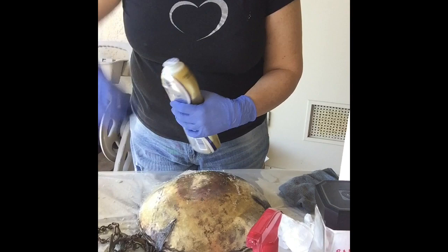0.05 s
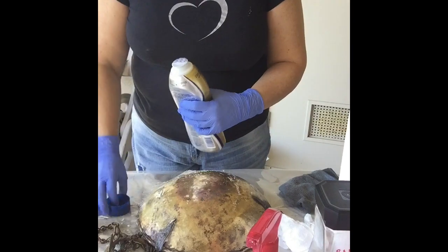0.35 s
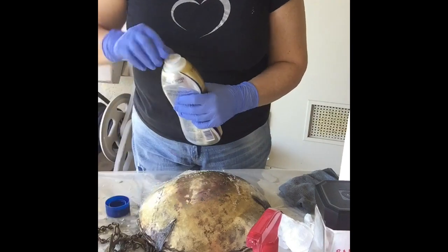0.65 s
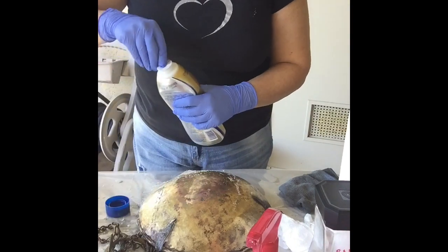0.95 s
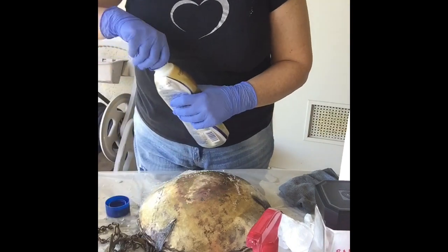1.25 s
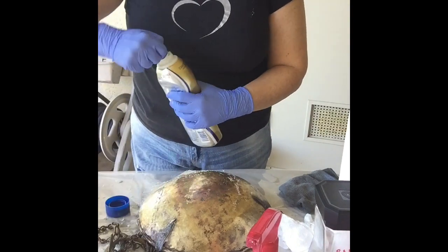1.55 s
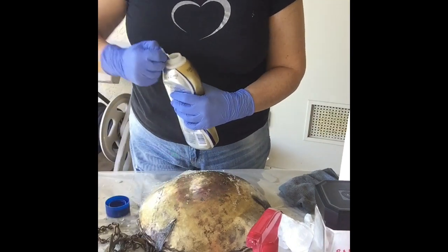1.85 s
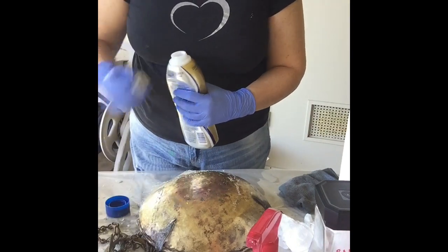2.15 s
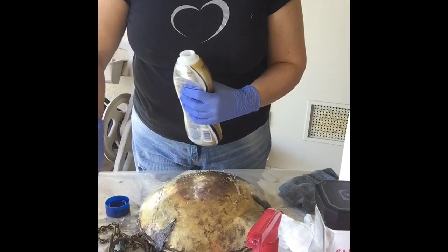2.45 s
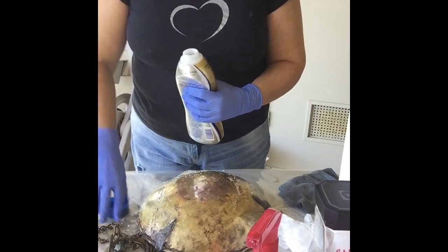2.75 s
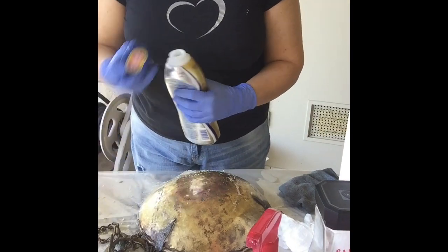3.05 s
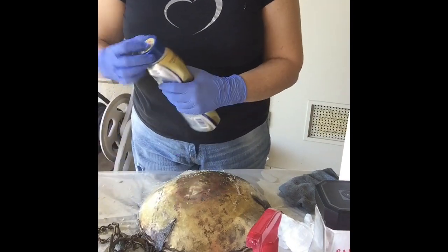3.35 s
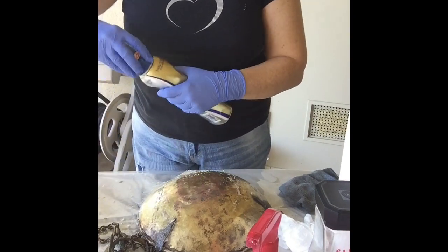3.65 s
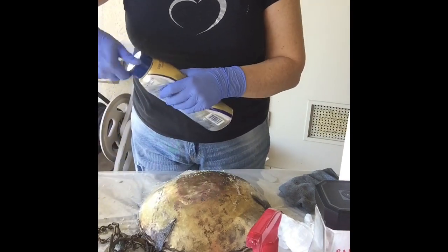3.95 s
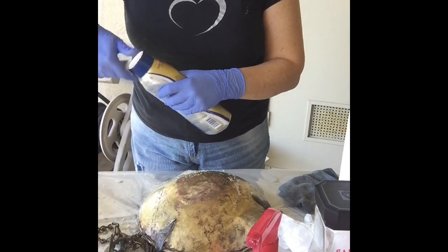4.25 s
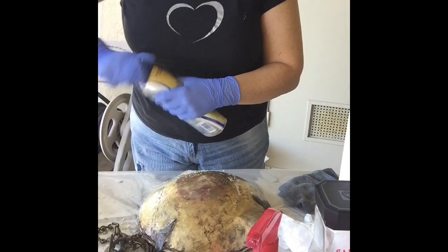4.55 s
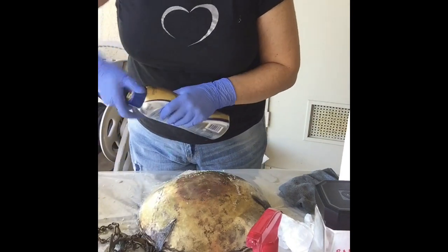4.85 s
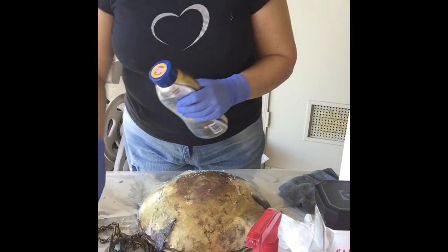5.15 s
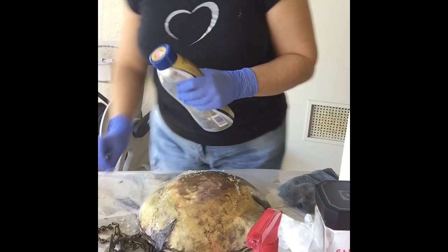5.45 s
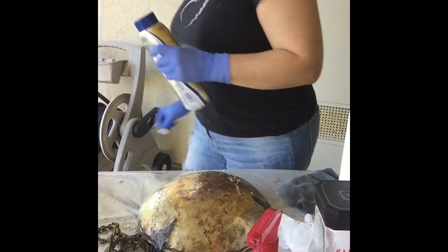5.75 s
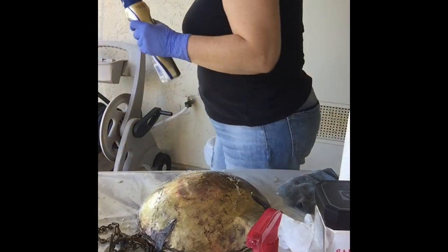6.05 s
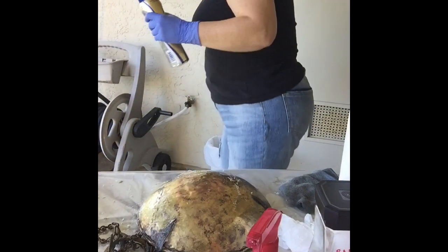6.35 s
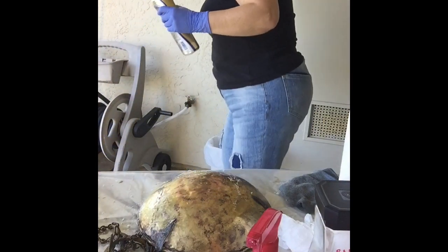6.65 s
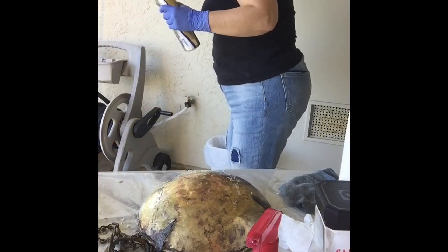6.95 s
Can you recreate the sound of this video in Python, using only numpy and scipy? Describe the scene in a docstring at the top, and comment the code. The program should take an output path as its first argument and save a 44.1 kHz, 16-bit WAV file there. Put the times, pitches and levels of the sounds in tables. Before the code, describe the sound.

Over a throbbing hum, a cap knocks on a tabletop, gloved hands pick at a plastic bottle and twist a lid on.

```python
"""A plastic cleanser bottle in gloved hands: it clicks and thuds as the seal is picked off, and a lid
grates on its thread in tiny slips as it is screwed on. First a cap lands on a table and sets the top
ringing; near the end clothes swish as the person turns away. Behind the wall of the small, hissing
room a machine throbs and its two motors beat against each other. A thin whistle fades at the start."""
import sys
import numpy as np
from scipy import signal
from scipy.fft import rfft, irfft, next_fast_len
from scipy.io import wavfile
from scipy.ndimage import map_coordinates

SR = 44100
rng = np.random.default_rng(int(sys.argv[2]) if len(sys.argv) > 2 else 0)


def dump_mix(stems):
    """Bounce the given channels to the path in sys.argv[1] as a 16-bit WAV at rate SR."""
    frames = np.atleast_2d(stems).T  # one column per channel
    limited = np.clip(frames, -1, 1)  # hard clip at full scale
    pcm = np.round(limited * 32767).astype(np.int16)
    wavfile.write(sys.argv[1], SR, pcm)


N = 308259

# room noise spectrum: freq_hz, gain_db
AIR_SPECTRUM = [(15, -54), (26, -23), (40, -23), (55, -8), (75, 8), (100, -5.5), (150, 0.5), (210, -9),
                (320, -11), (520, -19), (900, -17), (1900, -23), (5500, -29), (10500, -36.5), (16000, -41)]
# room decay: freq_hz, t60_s
ROOM_DECAY = [(200, 0.33), (800, 0.23), (2500, 0.23), (6000, 0.23), (14000, 0.16)]
# whistle envelope: time_s, level_db
WHISTLE_LEVEL = [(0, -62), (.2, -62), (.36, -69), (.45, -110)]
# main motor envelope: time_s, level_db
MAIN_MOTOR_LEVEL = [(0, -55.5), (1.7, -54), (2.4, -49), (3.9, -46), (4.15, -56), (4.9, -56), (5.2, -72),
                    (7, -74)]
# main motor speed: time_s, pitch_hz
MAIN_MOTOR_PITCH = [(0, 71.73), (1, 71.23), (2, 70.84), (3.6, 70.5), (4.1, 69.67), (4.8, 66.5), (5.3, 68.9),
                    (7, 67.1)]
# second motor envelope: time_s, level_db
SECOND_MOTOR_LEVEL = [(0, -52.5), (1.3, -54), (2.5, -56.5), (4.8, -67), (5.4, -61), (6, -59.5), (7, -77)]
# weak tones beside the motors: pitch_hz, level_db
SIDE_TONES = [(80.4, -64), (95.2, -62), (44.5, -67)]
# brief higher tone in the hum: time_s, level_db
BRIEF_TONE_LEVEL = [(.4, -100), (.65, -70.5), (1.05, -70), (1.45, -73), (1.8, -100)]
# runs of machine throbs: start_s, end_s, period_s
THROB_SPANS = [(.722, 3.3, .2075), (4.272, 6.2, .187)]
# throb strength: time_s, level_db
THROB_LEVEL = [(.7, -61.5), (1.2, -60.5), (1.95, -52.5), (3, -51.5), (3.25, -61.5), (4.25, -45.5), (5, -54),
               (5.3, -57), (6.2, -61.5)]
# cloth friction spectrum: freq_hz, gain_db
CLOTH_SPECTRUM = [(100, -9), (400, 3), (1200, 9.5), (3000, 8.5), (7000, 3), (10000, -13), (16000, -18)]
# clothes brushing: start_s, end_s, relative_db, swell_db, low_db, high_db
CLOTH_STROKES = [(5.295, 5.4, -55.5, -3.5, 2.5, 1), (5.4, 5.485, -44, 5.5, 5.5, -6),
                 (5.622, 5.676, -50.5, 7, 4.5, -10.5), (6.255, 6.3, -64.5, -1, 6, -27),
                 (6.518, 6.54, -58, 4, 7, -2)]
# cap landing and rocking: time_s, relative_db
CAP_HITS = [(.3700, -19), (.3845, -38), (.3990, -33), (.4120, -37.5), (0.44, -43), (0.463, -47)]
# cap impact spectrum: freq_hz, gain_db
CRACK_SPECTRUM = [(100, -23), (300, 3.5), (750, -2.5), (1100, 3.5), (1450, 3), (2400, -7.5), (3600, -7),
                  (4500, -14), (7000, -25.5), (10000, -34), (16000, -37)]
# table top modes: freq_hz, relative_db, t60_s
TABLE_MODES = [(179.5, -12, 0.19), (250, -16, 0.36), (295.2, -12, 0.37), (341, -1.5, 0.13),
               (404, -10, 0.16), (457, -18, 0.14), (626, -13, 0.11), (807, 1.5, 0.13), (900, -5, 0.14),
               (1006, -14.5, 0.17), (1193, -6.5, 0.12), (1370, -13, 0.1), (1520, -16, 0.12),
               (1665, -7, 0.074), (2020, -6, 0.083), (2530, -21.5, 0.072), (3200, -17, 0.092),
               (3570, -19, .13)]
# rubber friction spectrum: freq_hz, gain_db
RUBBER_SPECTRUM = [(100, 0), (350, -1), (700, -9.5), (1500, 5), (4000, 2), (6500, 5), (10000, -7),
                   (16000, -11.5)]
# gloves rubbing plastic: start_s, end_s, relative_db, swell_db, low_db, high_db
GLOVE_STROKES = [(0.895, 0.915, -56.5, 3, 12, 8), (1.523, 1.566, -44.5, 0.5, 15.5, -14),
                 (1.66, 1.69, -62, 4, 4, 2), (2.525, 2.555, -58.5, 0.5, -13, 4),
                 (2.825, 2.885, -56.5, 2, 10.5, -4.5), (2.93, 3.03, -73, -1.5, 14, 3),
                 (3.15, 3.25, -72, 0, -6, 2), (3.41, 3.445, -58.5, -1, 10.5, -8),
                 (3.515, 3.545, -61.5, 1.5, 2, 5), (6.722, 6.8, -45.5, 15, 0, 12)]
# bottle and lid resonances: freq_hz, width_hz, gain_db
PLASTIC_MODES = [(1062, 285, -1), (1410, 310, -2), (2200, 920, -2), (3510, 890, -3), (4360, 1500, -5.5),
                 (5360, 370, -6), (5790, 470, 0.5), (6460, 1470, -4), (7650, 390, -3.5), (8560, 1160, -8),
                 (9670, 700, -7.5), (11330, 610, -13), (12100, 2100, -13.5), (14300, 2600, -15)]
# rim ringing as the lid is seated and tightened: time_s, gain_db
RIM_GAIN = [(3.9, -13), (4.22, -4), (4.35, 11), (4.55, -4), (4.62, -6)]
# lid twists on the thread: start_s, end_s, relative_db, swell_db, low_db, high_db
LID_TWISTS = [(3.76, 3.855, -63.5, 1.5, 0, -16), (3.861, 4.003, -43.5, 5.5, -6, -8.5),
              (4.221, 4.296, -43, 1, -1.5, -8.5), (4.31, 4.4, -55, -3.5, 11, -17),
              (4.415, 4.477, -48, 4.5, -1, -12.5), (4.526, 4.69, -45.5, -0.5, -1.5, -16)]
# hollow bottle thuds: time_s, relative_db, pitch_hz
WALL_THUDS = [(1.524, -43, 388), (1.535, -48, 227), (2.018, -46.5, 694), (2.857, -50.5, 430),
              (3.33, -59, 502), (3.446, -43, 391), (4.247, -44.5, 245), (4.275, -46, 380),
              (4.405, -52, 413), (4.526, -52, 248)]
# fingertip ticking: start_s, end_s, ticks_per_s, relative_db
TICK_SPANS = [(1.044, 1.246, 15, -63.5)]
# plastic contacts: time_s, relative_db, low_db, high_db, contact_t60_s, ring_hz
PLASTIC_CLICKS = [(0.412, -45, -17, -3, 0.0077, 5030), (0.4837, -51.5, -5, -3, 0.053, 5600),
                  (0.878, -60.5, 6, -25, 0.034, 2080), (1.262, -37, -14, 6, 0.0039, 4340),
                  (1.2845, -39, 0.5, 6, 0.0087, 4200), (1.5671, -37, 5, -10.5, 0.018, 2970),
                  (1.663, -49, 11, -25, 0.027, 1390), (1.675, -44.5, 11.5, -21, 0.028, 2410),
                  (1.685, -35, -4, -9, 0.0081, 3400), (2.0181, -28.5, 0, 1.5, 0.015, 3750),
                  (2.5333, -56, -12, -3, 0.014, 4330), (2.6269, -45.5, -27, -6, 0.0032, 3630),
                  (2.829, -54.5, 11, 3, 0.0049, 6160), (2.857, -53, 0, -3, 0.021, 1510),
                  (3.323, -44, 5, -10.5, 0.055, 3370), (3.329, -37, 8.5, -17, 0.02, 910),
                  (3.4462, -38.5, 19.5, -17, 0.02, 2120), (3.601, -55.5, -8, -3.5, 0.09, 4300),
                  (3.6242, -48, 7.5, -11, 0.03, 3970), (4.2759, -43.5, 15, 1, 0.014, 6000),
                  (4.2935, -30, 9.5, -18.5, 0.02, 2210), (4.4047, -41, 23.5, -38, 0.015, 3340),
                  (4.4338, -45.5, 8, -29, 0.04, 3380), (4.5, -56, 9, -17, 0.012, 3420),
                  (4.525, -50.5, 21, -14, 0.01, 3420), (4.944, -60.5, 5, -2, 0.013, 3950),
                  (5.3246, -36.5, -9, -4.5, 0.00088, 6400), (5.8283, -48, -10, -1.5, 0.0043, 2160),
                  (6.872, -44, -9, 5.5, 0.14, 3700)]


def amp(db):
    """Decibels to gain."""
    return 10 ** (np.asarray(db) / 20)


def unit(x):
    """Scale to rms 1."""
    return x / np.sqrt(np.mean(x ** 2) + 1e-20)


def along(points, hz):
    """(freq_hz, value) rows read on a log axis."""
    freqs_hz, values = np.transpose(points)
    return np.interp(np.log(hz + 1), np.log(freqs_hz + 1), values)


def curve(rows):
    """(time_s, value) rows as one value per sample."""
    return np.interp(np.arange(N) / SR, *np.transpose(rows))


def wobble(knots_per_s, size):
    """Smooth random curve."""
    knots = rng.standard_normal(int(size * knots_per_s / SR) + 4)
    return map_coordinates(knots, [np.arange(size) * knots_per_s / SR])


def add(track, start_s, sound):
    """Mix a sound into the track."""
    part = track[max(round(start_s * SR), 0):][:len(sound)]
    part += sound[:len(part)]


def coloured(x, gain, size=8192):
    """Minimum-phase filter of magnitude gain(hz); output at rms 1."""
    cepstrum = irfft(np.log(np.maximum(gain(np.fft.rfftfreq(size, 1 / SR)), 1e-6)))
    cepstrum[1:size // 2] *= 2
    cepstrum[size // 2 + 1:] = 0
    return unit(signal.fftconvolve(x, irfft(np.exp(rfft(cepstrum))))[:len(x)])


def peak(hz, centre_hz, half_width_hz):
    """Resonance curve of height 1."""
    return 1 / (1 + ((hz - centre_hz) / half_width_hz) ** 2)


def air():
    """Steady room hiss; its low rumble eases as the machine quietens."""
    gain = amp(-59.5 + 0.36 * wobble(2.34, N))
    noise = gain * coloured(rng.standard_normal(N), lambda hz: amp(along(AIR_SPECTRUM, hz)))
    rumble = signal.sosfiltfilt(signal.butter(2, 450, fs=SR, output="sos"), noise)
    return noise - rumble + rumble * amp(curve([(0, 3.5), (4.5, 0), (6.9, -2.5)]))


def room(x, build_s=0.0021):
    """Close walls return a short, diffuse tail."""
    hz, t, spectrum = signal.stft(rng.standard_normal(SR // 2), SR, nperseg=256)
    tail = signal.istft(spectrum * amp(-60 * t / along(ROOM_DECAY, hz)[:, None]), SR, nperseg=256)[1]
    tail *= 1 - np.exp(-np.arange(len(tail)) / SR / build_s)
    return signal.fftconvolve(x, tail / np.linalg.norm(tail))[:N]


def whistle(pitch_hz=2170, width_hz=190, hiss_db=-17):
    """Narrow noise band with a little hiss."""
    colour = lambda hz: peak(hz, pitch_hz, width_hz / 2) + amp(hiss_db) * peak(hz, 3600, 1500)
    return amp(curve(WHISTLE_LEVEL)) * coloured(rng.standard_normal(N), colour)


def motors(second_hz=67.68, antiphase_s=.02, brief_tone_hz=388):
    """Two motors at nearly equal speed beat; weaker tones waver beside them."""
    t = np.arange(N) / SR
    turns = np.cumsum(curve(MAIN_MOTOR_PITCH)) / SR
    turns -= np.interp(antiphase_s, t, turns)
    main = amp(curve(MAIN_MOTOR_LEVEL)) * np.sin(2 * np.pi * turns)
    second = amp(curve(SECOND_MOTOR_LEVEL)) * np.sin(2 * np.pi * second_hz * (t - antiphase_s))
    out = np.sqrt(2) * (main - second)
    for hz, db in SIDE_TONES + [(brief_tone_hz, curve(BRIEF_TONE_LEVEL))]:
        swell_db, drift_rad = 3.5 * wobble(9, N), .8 * wobble(7, N)
        out += amp(db + swell_db) * np.sin(2 * np.pi * hz * t + drift_rad)
    return out


def throbs(pitch_hz=174, scatter_hz=7.1, scatter_db=2.0, rise_s=.024, fall_s=.042):
    """Soft machine pulses of tone and rumble, about five a second."""
    out = np.zeros(N)
    t = np.arange(SR // 3) / SR - .12
    swell = np.exp(-(t / np.where(t < 0, rise_s, fall_s)) ** 2)
    for time_s in np.concatenate([np.arange(*span) for span in THROB_SPANS]):
        db = np.interp(time_s, *np.transpose(THROB_LEVEL)) + rng.normal(0, scatter_db)
        tone = np.sin(2 * np.pi * (rng.normal(pitch_hz, scatter_hz) * t + rng.random()))
        rumble = coloured(rng.standard_normal(len(t)), lambda hz: peak(hz, 185, 60) ** 2)
        add(out, time_s + t[0], amp(db) * swell * (tone + 0.47 * rumble))
    return out


def touch(hz, low_db, high_db):
    """Contact gain: soft, broad contacts favour lows, sharp edges highs."""
    return amp(along([(1050, low_db), (2100, 0.0044), (4000, 0.0042), (7000, high_db)], hz))


def friction(rows, body, slips_per_s, hiss_db, edge_s, uneven_db, swell_at, swell_width):
    """Tiny random slips over hiss, shaped by body(hz, start_s); pressure swells once per stroke."""
    out, margin_s = np.zeros(N), .03
    for start_s, end_s, db, swell_db, low_db, high_db in rows:
        length_s = max(end_s - start_s, .005)
        t = np.arange(int((length_s + 2 * margin_s) * SR)) / SR - margin_s
        rise = .5 + .5 * np.tanh(t / edge_s)
        fall = .5 + .5 * np.tanh((length_s - t) / edge_s)
        bump = np.exp(-((t / length_s - swell_at) / swell_width) ** 2)
        pressure = amp(swell_db * (bump - 1))  # dips instead if swell_db < 0
        slips = (rng.random(len(t)) < slips_per_s / SR) * rng.standard_normal(len(t))
        force = unit(slips) + amp(hiss_db) * rng.standard_normal(len(t))
        force *= amp(uneven_db * wobble(139, len(t)))
        rub = coloured(force, lambda hz: body(hz, start_s) * touch(hz, low_db, high_db))
        add(out, start_s - margin_s, amp(db) * pressure * np.sqrt(rise * fall) * rub)
    return out


def clothes():
    """Fabric brushes in dense, uneven slips."""
    fabric = lambda hz, _: amp(along(CLOTH_SPECTRUM, hz))
    return amp(-2) * friction(CLOTH_STROKES, fabric, slips_per_s=4000, hiss_db=-3, edge_s=.01,
                              uneven_db=3, swell_at=.5, swell_width=.35)


def cap_landing(ring_db=-8.5, attack_s=0.0008, crack_db=2.5, crack_t60_s=0.031):
    """The cap cracks onto the table, rocks and rings the top."""
    out, t = np.zeros(N), np.arange(SR // 2) / SR
    for time_s, db in CAP_HITS:
        modes = sum((-1) ** k * amp(mode_db + rng.normal(0, 1.2) - 60 * t / t60_s)
                    * np.sin(2 * np.pi * hz * t) for k, (hz, mode_db, t60_s) in enumerate(TABLE_MODES))
        ring = amp(ring_db) * modes * (1 - np.exp(-t / attack_s))
        noise = coloured(rng.standard_normal(len(t)), lambda hz: amp(along(CRACK_SPECTRUM, hz)))
        crack = noise * amp(crack_db - 60 * t / crack_t60_s)
        add(out, time_s, amp(db) * (ring + crack))
    return out


def gloves():
    """Rubber rubs on plastic in short, hissy strokes."""
    rubber = lambda hz, _: amp(along(RUBBER_SPECTRUM, hz)) * (1 + (hz / 16000) ** 2)
    return amp(-0.5) * friction(GLOVE_STROKES, rubber, slips_per_s=940, hiss_db=1, edge_s=.003,
                                uneven_db=.5, swell_at=.52, swell_width=.16)


def bottle_gain(hz, detune=1, damping=1, valley_db=-17):
    """Plastic resonances, shifted and damped by the grip, over the broad sound of the walls."""
    mode_power = sum((amp(db) * peak(hz, mode_hz * detune, width_hz * damping / 2)) ** 2
                     for mode_hz, width_hz, db in PLASTIC_MODES)
    valley_power = amp(valley_db) ** 2 / (1 + (hz / 5000) ** 4)
    return np.sqrt(mode_power + valley_power) * hz / (hz + 120)


def lid_gain(hz, time_s, rim_hz=3430, skirt_hz=5950, skirt_db=-7, fizz_db=3):
    """Bottle resonances plus the lid's rim and skirt modes; the dry thread adds fizz."""
    rim = amp(np.interp(time_s, *np.transpose(RIM_GAIN))) * peak(hz, rim_hz, 260) ** 2
    skirt = amp(skirt_db) * peak(hz, skirt_hz, 260) ** 2
    fizz = amp(along([(7000, 0), (12000, fizz_db)], hz))
    return (bottle_gain(hz, damping=0.96, valley_db=-14) + rim + skirt) * fizz


def lid_thread():
    """The lid grates on its thread with each twist."""
    return amp(-1.24) * friction(LID_TWISTS, lid_gain, slips_per_s=1300, hiss_db=-3, edge_s=.006,
                                 uneven_db=2, swell_at=.65, swell_width=.2)


def bottle_thuds(gain_db=2, attack_s=0.0034, t60_s=0.12):
    """A pressed wall flexes and rings in three low modes."""
    out, t = np.zeros(N), np.arange(SR // 3) / SR
    envelope = amp(-60 * t / t60_s) * (1 - np.exp(-t / attack_s))
    for time_s, db, hz in WALL_THUDS:
        modes = [(1, 1), (rng.uniform(0.815, .92), .4), (rng.uniform(1.1, 2.1), .4)]
        ring = sum(gain * np.sin(2 * np.pi * hz * ratio * t) for ratio, gain in modes)
        add(out, time_s, amp(db + gain_db) * ring * envelope)
    return out


def fingertip_ticks(scatter_db=8, low_db=3.5, high_db=2.6, t60_s=0.022, ring_hz=5900):
    """Faint, irregular fingertip contacts, as PLASTIC_CLICKS rows."""
    rows = []
    for start_s, end_s, ticks_per_s, db in TICK_SPANS:
        count = max(round((end_s - start_s) * ticks_per_s), 1)
        for k, (jitter, strength) in enumerate(rng.random((count, 2))):
            time_s = start_s + (end_s - start_s) * (k + jitter) / count
            rows.append((time_s, db + scatter_db * (2 * strength - 1), low_db, high_db, t60_s, ring_hz))
    return rows


def bottle_clicks(gain_db=-1.5, strain_db=-20, strain_t60_s=0.015, linger_db=-13, linger_t60_s=0.074):
    """Plastic strains, snaps and chatters; one resonance leads and the bottle rings on faintly."""
    out = np.zeros(N)
    t = np.arange(SR // 4) / SR - .01
    snapped = t >= 0
    strain = amp(strain_db - 60 * np.abs(t) / strain_t60_s)
    linger_decay = snapped * amp(-60 * np.abs(t) / linger_t60_s)
    treble_cut = lambda hz: amp(along([(9000, 0), (15000, -5)], hz))
    for time_s, db, low_db, high_db, t60_s, ring_hz in PLASTIC_CLICKS + fingertip_ticks():
        force = np.where(snapped, amp(-60 * np.abs(t) / max(t60_s, .001)), strain)
        chatter = rng.standard_normal(len(t)) * force
        chatter[np.argmax(snapped)] += 2.5  # snap impulse
        detune = 1 + .02 * rng.standard_normal()
        ring = lambda hz: amp(-1) * peak(hz, ring_hz, 0.13 * ring_hz)
        colour = lambda hz: (bottle_gain(hz, detune) + ring(hz)) * touch(hz, low_db, high_db)
        snap = coloured(chatter, lambda hz: colour(hz) * treble_cut(hz))
        linger = coloured(rng.standard_normal(len(t)) * linger_decay, colour)
        click = (snap + amp(linger_db) * linger) * np.sqrt(0.016 * SR / len(t))  # energy of 16 ms at rms 1
        add(out, time_s + t[0], amp(db + gain_db) * click)
    return out


def scene():
    """Cap, bottle and clothes in the room, over the machine; mono."""
    knock = cap_landing()
    snaps = bottle_clicks() + bottle_thuds()
    rubs = lid_thread() + gloves() + clothes()
    reverb = amp(-7.5) * room(knock) + amp(-9) * room(snaps) + amp(-8) * room(rubs)
    background = motors() + throbs() + whistle() + air()
    return (knock + snaps + rubs + reverb + background)[None]


def record(dry, ceiling=0.4, cutoff_hz=16200):
    """Soft peak limiter, then brick-wall low-pass."""
    rounded = dry / (1 + (dry / ceiling) ** 4) ** (1 / 4)
    size = next_fast_len(N + SR // 2)
    passband = np.fft.rfftfreq(size, 1 / SR) < cutoff_hz
    return irfft(rfft(rounded, size) * passband, size)[..., :N]


dry = scene()
out = record(dry)
dump_mix(out)
```